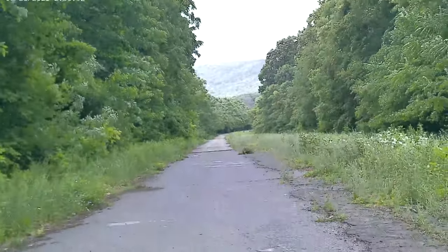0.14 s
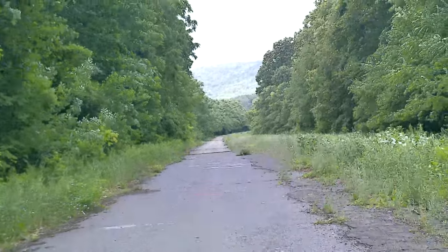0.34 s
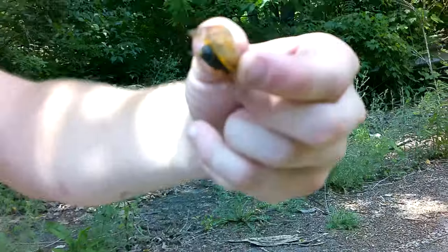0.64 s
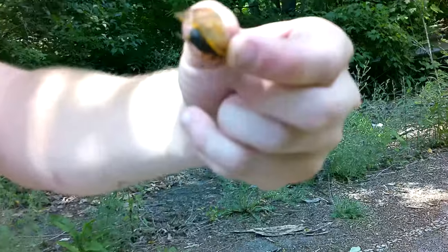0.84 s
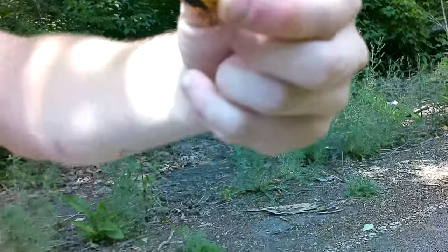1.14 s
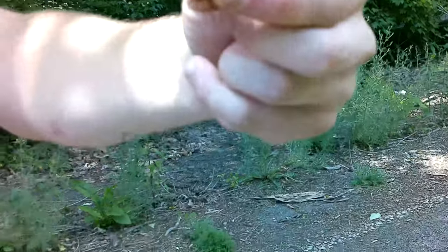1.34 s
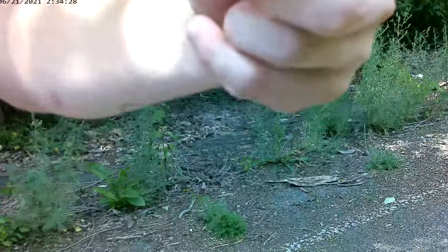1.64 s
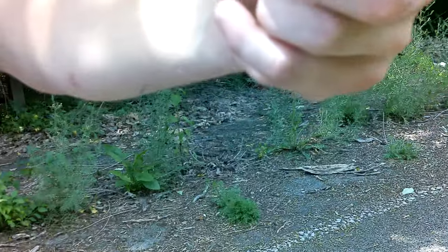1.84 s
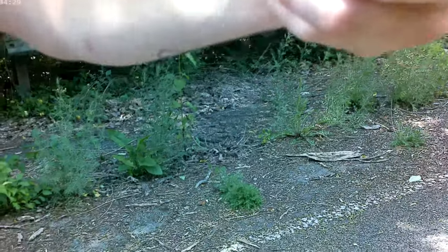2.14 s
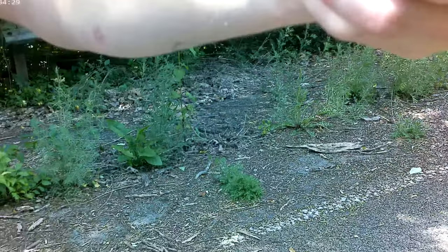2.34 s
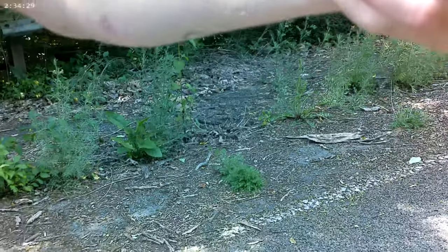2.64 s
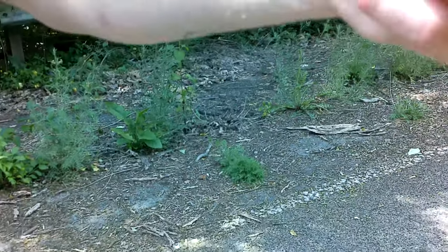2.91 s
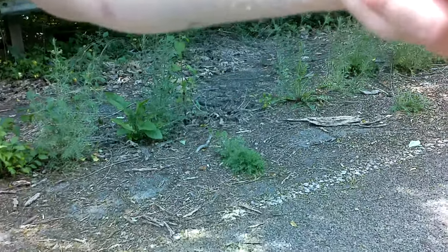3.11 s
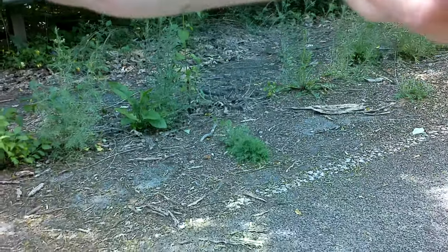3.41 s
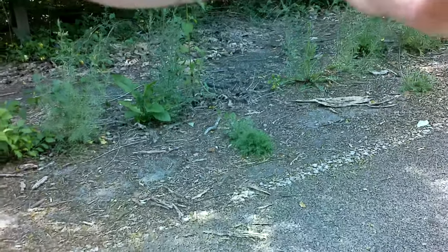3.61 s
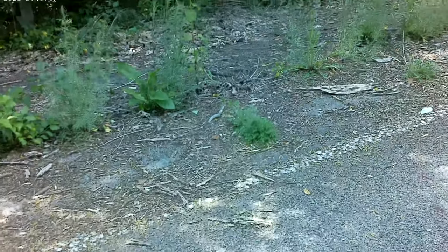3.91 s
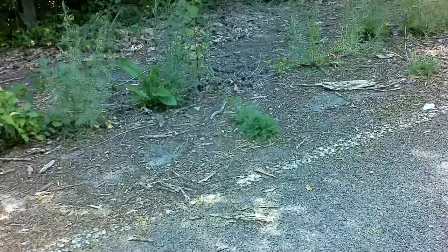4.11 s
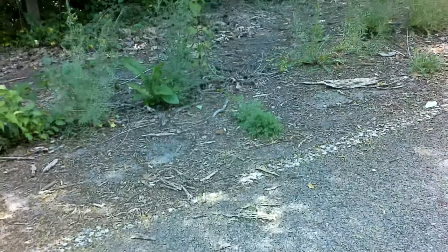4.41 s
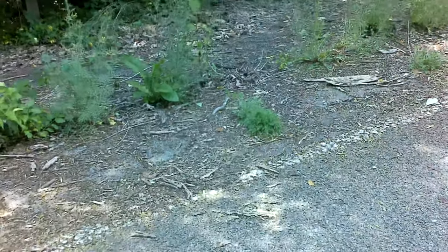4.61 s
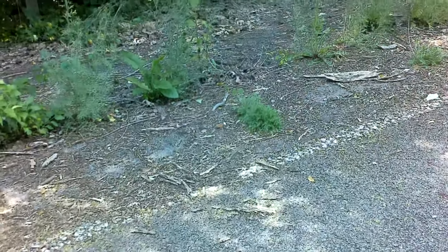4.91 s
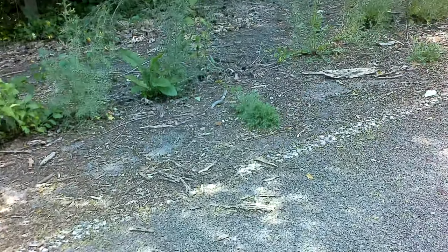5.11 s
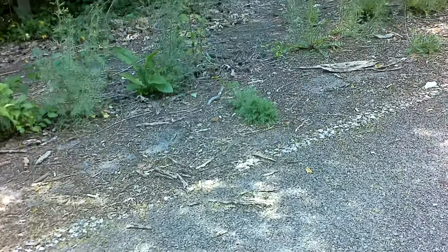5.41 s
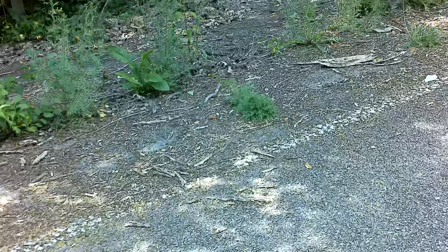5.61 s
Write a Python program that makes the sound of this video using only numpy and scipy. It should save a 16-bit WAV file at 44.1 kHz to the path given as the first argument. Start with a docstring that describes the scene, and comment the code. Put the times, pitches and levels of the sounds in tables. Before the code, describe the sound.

A few handling clicks and a loud pop, then a hand-held cicada buzzes close up, growing louder over distant cicadas hissing in the trees.

```python
"""On a quiet country road, fingers click on a camera; the sound cuts out and returns with a pop.
Then a cicada held in the fingers squawks. Its two tymbals (ribbed drum skins) buckle in turn, rib by
rib, and the clicks ring its hollow abdomen. It grows louder, turns raspy and is briefly squeezed.
Behind it a chorus of cicadas hisses in the trees, over a far drone and the outdoor air."""
import sys
import numpy as np
from scipy import signal
from scipy.fft import rfft, irfft, next_fast_len
from scipy.io import wavfile
from scipy.ndimage import map_coordinates

SR = 44100
rng = np.random.default_rng(int(sys.argv[2]) if len(sys.argv) > 2 else 0)


def unload_wav(signal):
    """Save mono or channel-first audio to the path in sys.argv[1] as 16-bit WAV at rate SR, clipped to [-1, 1]."""
    wavfile.write(
        sys.argv[1],
        SR,
        np.round(np.clip(np.atleast_2d(signal).T, -1, 1) * 32767).astype(np.int16),
    )


N = 253575

# How hard the cicada works. Each row: time in seconds, abdomen effort in dB, rib effort in dB.
EFFORT = [(0.76, -30.5, -65), (1.72, -27, -40.5), (3.01, -21.5, -39.5), (4.24, -18, -34.5)]
# The squeeze of the abdomen: start, end and time to close or open, all in seconds.
SQUEEZE_TIMES = (4.64, 4.962, 0.038)
# The raspy spell: start, end and fade time, all in seconds.
RASP_TIMES = (1.55, 4.08, 0.42)
# The tone of the tymbal skin's crinkles and snaps. Each row: frequency in Hz, gain in dB.
SKIN_TONE = [(3000, -46), (8000, -8), (9600, 2), (10400, 10.5), (12000, 6.5), (13500, 2), (14500, -21),
             (16000, -30)]
# The drone of far cicadas. Each row: frequency in Hz, gain in dB.
DRONE_TONE = [(800, -35), (1150, -17.5), (1330, 9), (1500, -5), (2000, -42.5)]
MUTE_S, POP_S, RESUME_S = 0.643, 0.680, 0.717


def cicada():
    """Rib clicks ring the hollow abdomen and also reach the air directly; a squeeze damps both."""
    # The tone of the abdomen, of its higher ring when squeezed, and of a bare rib click.
    # Each row: frequency in Hz, gain in dB.
    abdomen_tone = [(400, -77), (750, -15.5), (950, -6.5), (1130, -3), (1290, -2), (1580, -10.5),
                    (1950, -9.5), (2400, -32), (3000, -45.5), (5000, -57.5)]
    squeezed_tone = [(700, -34), (1500, -22.5), (1900, 3), (2150, 1), (2550, -6.5), (2900, 0), (4000, -24)]
    rib_tone = [(300, -43), (900, -16.5), (1750, 3), (2250, 2), (2600, 0.5), (3000, -3.5), (3550, 7),
                (5000, -13), (7000, 0.5), (8200, -10.5), (9500, -19), (16000, -39)]
    squeeze, released = posture()
    abdomen_db, rib_db = curves(EFFORT) + 0.5 * wobble(per_s=11)  # effort is never quite even
    # The abdomen flexes as it closes and opens; there it catches and its level dips further.
    flex = sum(np.exp(-((clock() - s) / 0.047) ** 2) for s in SQUEEZE_TIMES[:2])
    squeeze_db, catch_db, released_db = -10.5, -5.5, -0.86
    abdomen_db += (squeeze_db + catch_db * flex * squeeze) * squeeze + released_db * released
    rib_db -= 3.5 * squeeze
    ribs = tymbals(rib_count=8)
    echoed = with_echoes(ribs, echo_db=-13)
    abdomen = amp(abdomen_db) * unit(coloured(echoed, abdomen_tone))
    squeezed = (amp(-48) * squeeze + amp(-40) * flex) * unit(coloured(ribs, squeezed_tone))
    bare_ribs = amp(rib_db + 4.5) * unit(coloured(echoed, rib_tone))
    return abdomen + squeezed + bare_ribs + amp(rib_db) * skin(ribs) + snaps(click_count=4)


def tymbals(rib_count):
    """The two tymbals take turns; in each stroke the ribs buckle one by one, a click each."""
    # The pace of both tymbals together. Each row: time in seconds, strokes per second.
    stroke_rates = [(0.76, 130), (1.23, 125), (1.34, 130), (2.2, 134), (2.67, 126), (2.74, 131),
                    (4.77, 130), (4.98, 122), (5.74, 127)]
    strokes_done = np.cumsum(curves(stroke_rates)[0] + 1.6 * wobble(per_s=9)) / SR
    starts = np.interp(np.arange(1, int(strokes_done[-1])), strokes_done, clock())
    # No two strokes or ribs are alike, and left and right differ in timing and force.
    chance = rng.standard_normal((len(starts), 3 + 2 * rib_count))
    shift, force, pace = chance[:, :3].T
    rib_gap, rib_force = np.split(chance[:, 3:], 2, axis=1)
    side = (-1) ** np.arange(len(starts))
    starts = starts + .00018 * side + .0003 * shift
    stroke_db = .6 * side + .85 * force
    # The ribs fold fast at first, then slower, so each stroke is a falling chirp.
    progress = np.linspace(0, 1, rib_count)
    first_hz, last_hz = (np.interp(starts, clock(), rate)[:, None] for rate in rib_rates())
    rib_hz = last_hz + (first_hz - last_hz) * (1 - progress) ** 1.5
    gaps = (1 + .026 * pace[:, None] + .023 * rib_gap) / rib_hz
    times = starts[:, None] + np.cumsum(gaps, axis=1)
    swell = .65 + np.sin(np.pi * progress ** .8)
    return unit(impulses(times, swell * amp(stroke_db[:, None] + 1.2 * rib_force)))


def rib_rates():
    """Click rates of a stroke's first and last ribs: effort tightens the tymbals, a squeeze slackens them."""
    effort_db = curves(EFFORT)[0]
    squeeze, released = posture()
    first_hz = 1540 + 27 * (effort_db - effort_db[0]) - 380 * squeeze + 294 * released
    last_hz = 1091 - 50 * squeeze - 55 * released
    return first_hz, last_hz


def posture():
    """How far the abdomen is squeezed, and how far it has been let go again (both 0 to 1)."""
    _, end, ramp_s = SQUEEZE_TIMES
    return spell(*SQUEEZE_TIMES), step(end, ramp_s)


def skin(ribs):
    """The stiff tymbal skin crinkles and rings thinly at every rib, most in the raspy spell."""
    # The skin's ring. Each row: frequency in Hz, level in dB, seconds to fade by 60 dB.
    skin_modes = [(8761, 0, 0.011)]
    crinkle = unit(coloured(ribs * rng.standard_normal(N), SKIN_TONE))
    thin_ring = unit(signal.fftconvolve(ribs, ring(skin_modes, clock()[:SR // 50]))[:N])
    return amp(-14.5 + 8.5 * spell(*RASP_TIMES)) * (crinkle + amp(-5) * thin_ring)


def snaps(click_count, per_s=12):
    """In the raspy spell a tymbal springs back at uneven times, each time with a few quick clicks."""
    # One snap: click rate in Hz, loss from click to click in dB.
    burst = (2300, 4)
    click_hz, loss_db = burst
    start, end, _ = RASP_TIMES
    chance = rng.standard_normal((int((end - start) * per_s), 2 + click_count))
    snap_times = end - (np.arange(len(chance)) + 1 + .25 * chance[:, 0]) / per_s
    click = np.arange(click_count)
    click_times = snap_times[:, None] + (click + 0.33 * chance[:, 2:]) / click_hz
    click_db = -17 + 3 * chance[:, 1:2] - loss_db * click
    return coloured(impulses(click_times, amp(click_db)), SKIN_TONE)


def with_echoes(x, echo_db):
    """Weak echoes from the arm, the body and the road fill the gaps between strokes."""
    t = clock()[:SR // 20]
    tail = rng.standard_normal(len(t)) * (t > .003) * amp(-60 * t / .09)
    return unit(x + amp(echo_db) * signal.fftconvolve(x, tail / np.linalg.norm(tail))[:N])


def finger_clicks():
    """Fingers click on the camera: a crack, a knock of the case, a small metal part ringing."""
    # The clicks. Each row: start in seconds, then gains in dB for crack, case and metal.
    clicks = [(0.1921, -12, -36, -32), (0.364, -20, -60, -60), (0.3968, -5.5, -24.5, -50),
              (0.445, -21.5, -60, -60), (0.497, -10, -51, -14), (0.5609, -16, -27, -57)]
    # The tone of a crack. Each row: frequency in Hz, gain in dB.
    crack_tone = [(200, -28), (1000, -7), (2000, -5.5), (2900, 1), (4400, 2), (6500, -17), (9000, -28),
                  (16000, -52)]
    # How case and metal ring. Each row: frequency in Hz, level in dB, seconds to fade by 60 dB.
    case_modes = [(154, -6, 0.15), (525, 0, 0.077), (580, 4, 0.081), (2760, 8.5, 0.015)]
    metal_modes = [(2260, -2.5, 0.069), (3580, -8, .05), (4240, -1.5, 0.031), (4520, -6, 0.064),
                   (6620, 0.5, 0.025)]
    t = clock()
    case, metal = ring(case_modes, t[:SR // 5]), ring(metal_modes, t[:SR // 5])
    cracks, rings = np.zeros(N), np.zeros(N)
    for start, crack_db, case_db, metal_db in clicks:
        age = np.maximum(t - start, 0)
        cracks += (t >= start) * amp(crack_db - 60 * age / 0.02) * rng.standard_normal(N)
        rings[round(start * SR):][:len(case)] += amp(case_db) * case + amp(metal_db) * metal
    return coloured(cracks, crack_tone) + rings


def pop(db, rise_s, relax_s):
    """The camera's input jumps away from zero, sticks, and eases back once sound passes again."""
    t = clock()
    jump = np.clip((t - POP_S) / rise_s, 0, 1)
    return -amp(db) * jump * np.exp(-np.maximum(t - RESUME_S, 0) / relax_s)


def hand_bump(at_s, db, width_s):
    """A soft, dull bump of the hand."""
    thud = noise([(60, -17), (150, -1), (240, -2), (330, -5), (480, -14), (900, -36)])
    return amp(db) * np.exp(-((clock() - at_s) / width_s) ** 2) * thud


def chorus():
    """Cicadas in the trees swell and sink, the high hiss more than the low, over a steady drone."""
    # The swell of the chorus. Each row: time in seconds, level in dB.
    swells = [(0.76, -17.5), (1.45, -15.5), (2.37, -19), (2.4, -22.5), (3.27, -27.5), (3.63, -24.5),
              (4.3, -26), (5.74, -21.5)]
    # The tones of the high and the low hiss. Each row: frequency in Hz, gain in dB.
    high_tone = [(2500, -46), (4400, -16.5), (5100, -6), (5600, -1), (6100, -1), (6550, -6), (7100, -18.5),
                 (7900, -27), (10000, -33.5), (16000, -50)]
    low_tone = [(1800, -36), (3050, -13), (3400, -8.5), (3700, -1.5), (4200, 3), (4800, 0), (5600, -3.5),
                (7500, -37.5)]
    swell_db = curves(swells)[0] + 0.44 * wobble(per_s=8)
    low_db = -27 + 0.58 * (swell_db - swell_db.mean())
    high = amp(swell_db + 0.78) * swarm(high_tone, clicks_per_s=9000, flutter_db=0.5)
    low = amp(low_db) * swarm(low_tone, clicks_per_s=9000, flutter_db=0.7)
    return high + low + amp(-37) * noise(DRONE_TONE)


def swarm(tone, clicks_per_s, flutter_db):
    """Countless far tymbal clicks merge into a fluttering hiss."""
    when, size = rng.random((int(clicks_per_s * N / SR), 2)).T
    clicks = impulses(when * N / SR, 2 * size - 1)
    return unit(coloured(clicks, tone) * amp(flutter_db * wobble(per_s=110)))


def road_air():
    """Open air on the road, with the drone of far cicadas."""
    # The tone of the air. Each row: frequency in Hz, gain in dB.
    road_tone = [(35, -17), (60, -4.5), (146, -4.5), (448, -11.5), (593, -9.5), (862, -11), (1310, -7.5),
                 (1580, -12), (2350, -12), (2580, -9.5), (3120, -11), (3420, -8), (6580, -15), (8120, -26),
                 (16000, -39.5)]
    return amp(-35.5) * noise(road_tone) + amp(-45) * noise(DRONE_TONE)


def roadside_air():
    """Steady outdoor air at the edge of the road."""
    # The tone of the air. Each row: frequency in Hz, gain in dB.
    roadside_tone = [(20, 4.5), (50, -1.5), (105, 4), (170, -1.5), (300, -4), (600, -4), (1500, 9),
                     (3000, -7.5), (8000, -24)]
    return amp(-34.5) * noise(roadside_tone)


def amp(db):
    """Turn decibels into a gain."""
    return 10 ** (np.asarray(db) / 20)


def unit(x):
    """Scale x to an average (rms) level of 1."""
    return x / np.sqrt(np.mean(x ** 2) + 1e-20)


def clock():
    """The time of each sample in seconds."""
    return np.arange(N) / SR


def curves(rows):
    """Join the rows with straight lines: one curve for each column after the time."""
    times, *columns = np.transpose(rows)
    return [np.interp(clock(), times, column) for column in columns]


def wobble(per_s):
    """A smooth curve through per_s random values a second."""
    return map_coordinates(rng.standard_normal(int(N * per_s / SR) + 4), [clock() * per_s])


def step(at_s, ramp_s):
    """Rise from 0 to 1 around the time at_s."""
    return np.clip((clock() - at_s) / ramp_s + .5, 0, 1)


def spell(start, end, ramp_s):
    """1 from start to end, 0 outside, with sloping sides."""
    return step(start, ramp_s) - step(end, ramp_s)


def coloured(x, tone):
    """Filter x so that it follows the (Hz, dB) points of tone."""
    size = 2 * next_fast_len(N // 2 + SR // 4)
    hz, db = np.transpose(tone)
    log_hz = np.log(np.fft.rfftfreq(size, 1 / SR) + 1)
    cepstrum = irfft(np.log(amp(np.interp(log_hz, np.log(hz), db))))
    # Folding onto the first half makes the filter ring after a click, never before it.
    cepstrum[1:size // 2] *= 2
    cepstrum[size // 2 + 1:] = 0
    return irfft(rfft(x, size) * np.exp(rfft(cepstrum)))[:N]


def noise(tone):
    """Noise with the given tone, at an average level of 1."""
    return unit(coloured(rng.standard_normal(N), tone))


def impulses(times, sizes):
    """Clean clicks that can fall between samples."""
    at = np.ravel(times)[:, None] * SR
    index = np.floor(at).astype(int) + np.arange(-7, 9)
    window = np.cos(np.pi * (index - at) / 16) ** 2
    taps = np.ravel(sizes)[:, None] * np.sinc(index - at) * window
    inside = (index >= 0) & (index < N)
    return np.bincount(index[inside], taps[inside], N)


def ring(modes, t):
    """The fading tones of a thing struck at t = 0."""
    onset = 1 - np.exp(-(t / 0.00059) ** 2)
    return onset * sum(amp(db - 60 * t / fade_s) * np.sin(2 * np.pi * hz * t) for hz, db, fade_s in modes)


def scene():
    """The road, a short silence with a pop, then the cicada at the roadside."""
    t = clock()
    before = (road_air() + finger_clicks()) * (t < MUTE_S)
    bumps = hand_bump(at_s=0.724, db=-35, width_s=0.056) + hand_bump(at_s=2.055, db=-30, width_s=0.014)
    fade_in = np.clip((t - RESUME_S) / 0.011, 0, 1)
    after = (roadside_air() + bumps + cicada() + chorus()) * fade_in
    return (before + after + pop(db=-.6, rise_s=.000055, relax_s=.036))[None]


def record(dry):
    """The camera flattens peaks beyond full scale and drops the very highest treble."""
    size, top_hz = next_fast_len(N + SR // 2), 15850
    spectrum = rfft(np.clip(dry, -1, 1), size)
    return irfft(spectrum * (np.fft.rfftfreq(size, 1 / SR) < top_hz), size)[..., :N]


dry = scene()
out = record(dry)
unload_wav(out)
```